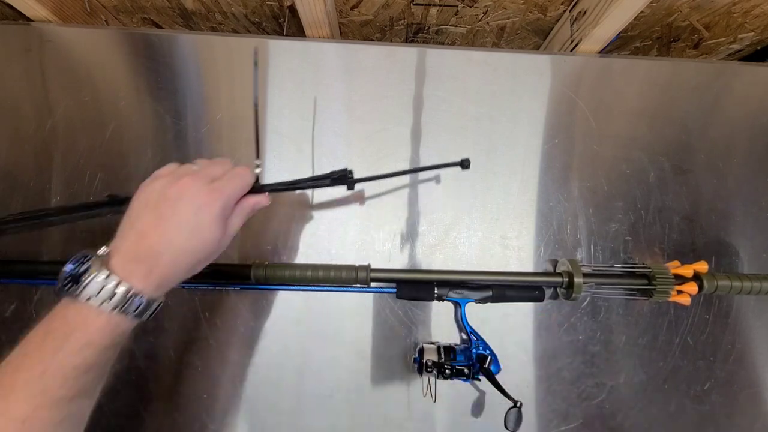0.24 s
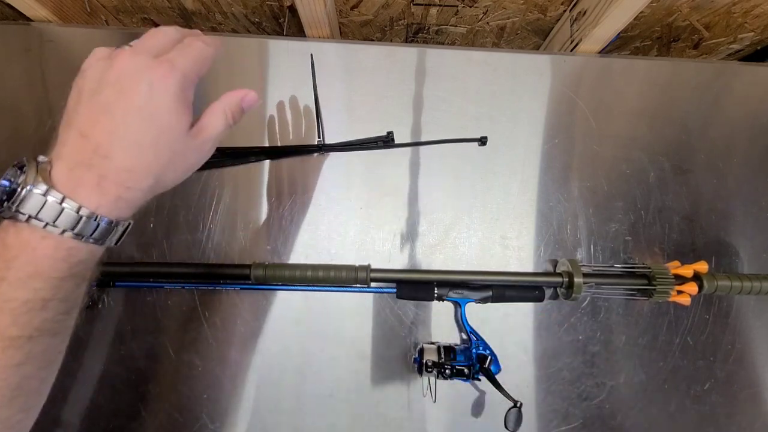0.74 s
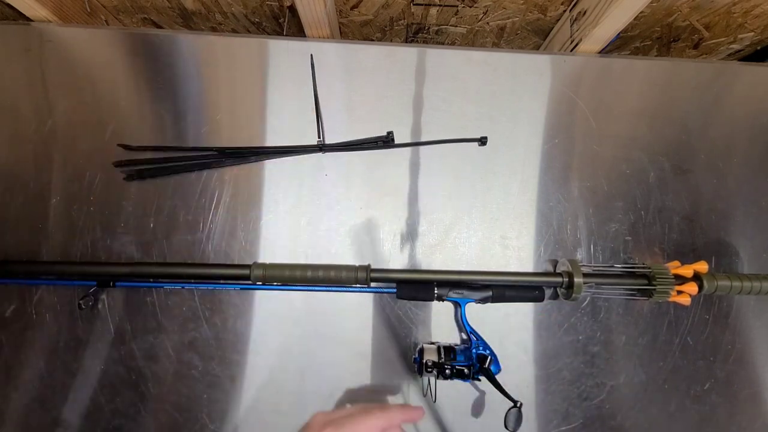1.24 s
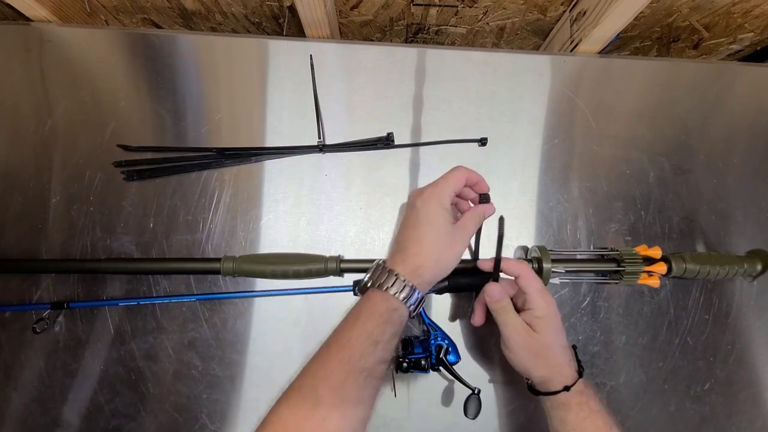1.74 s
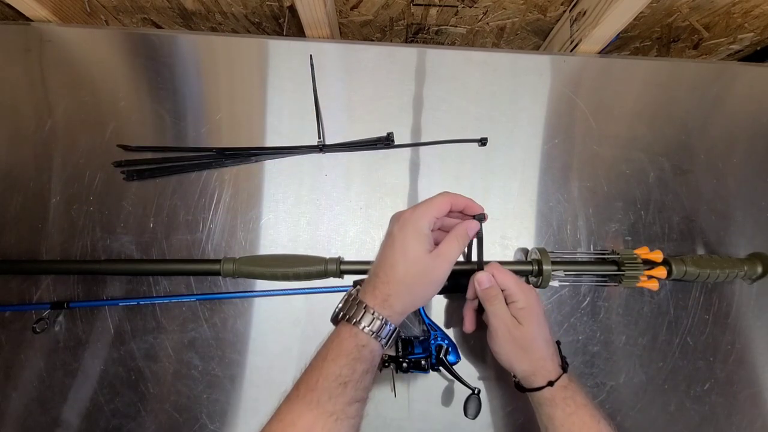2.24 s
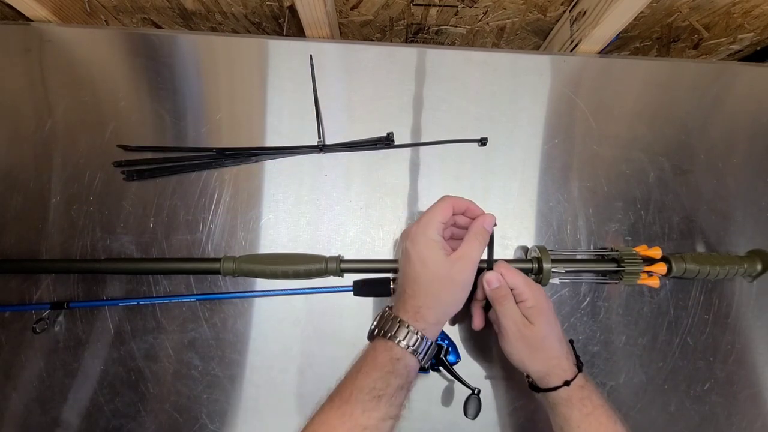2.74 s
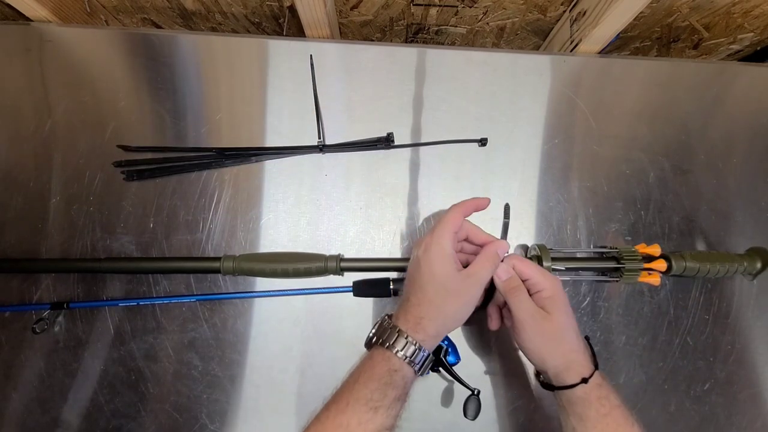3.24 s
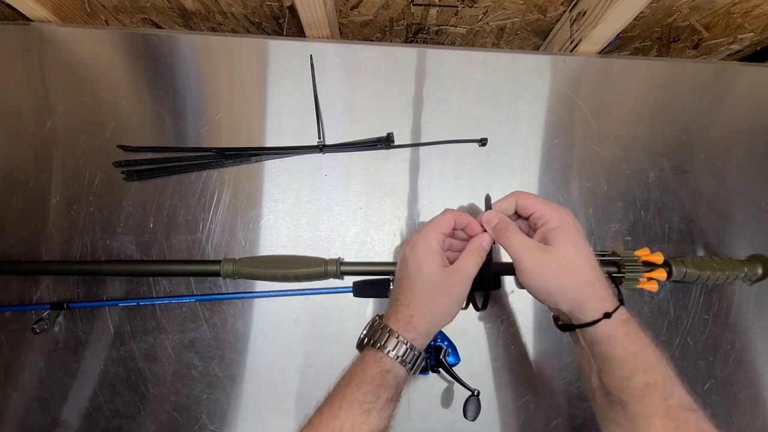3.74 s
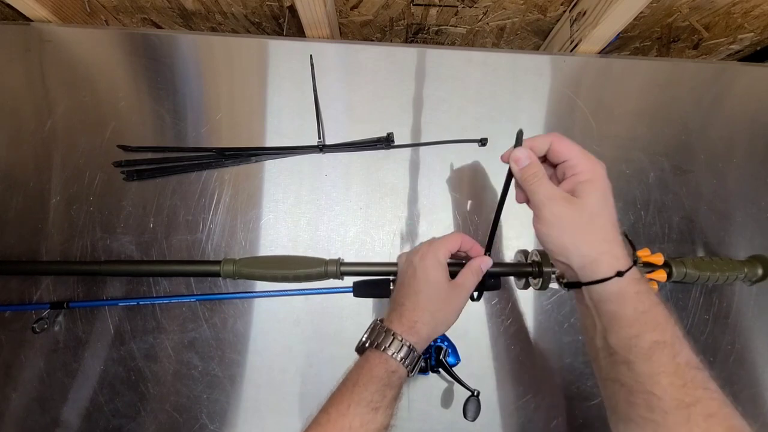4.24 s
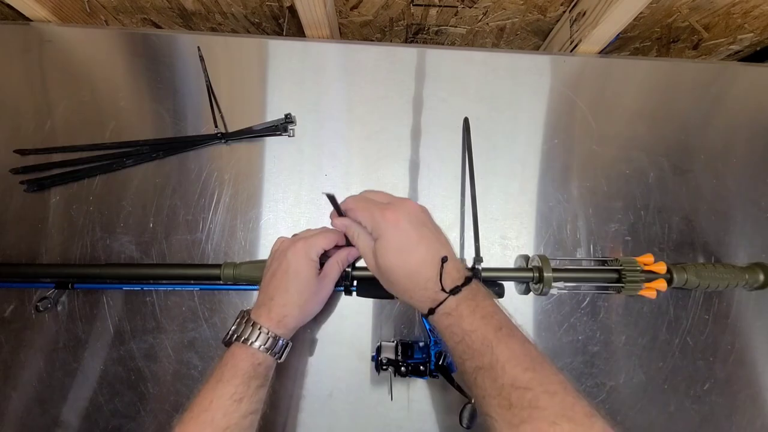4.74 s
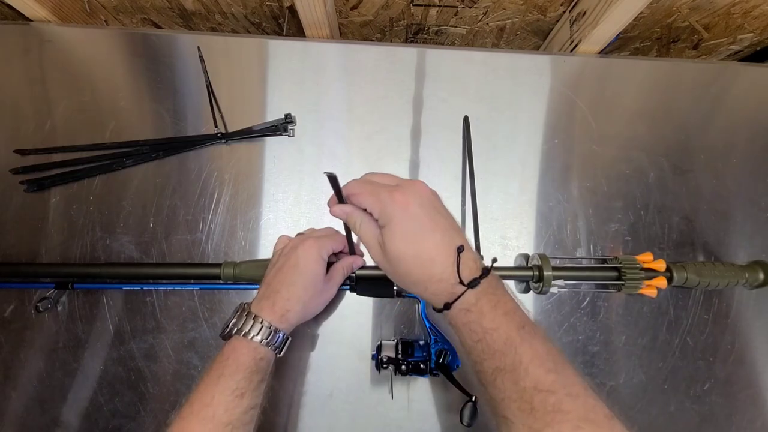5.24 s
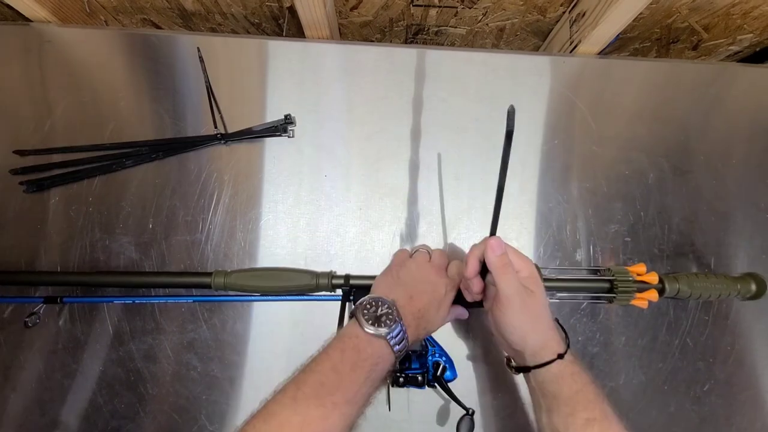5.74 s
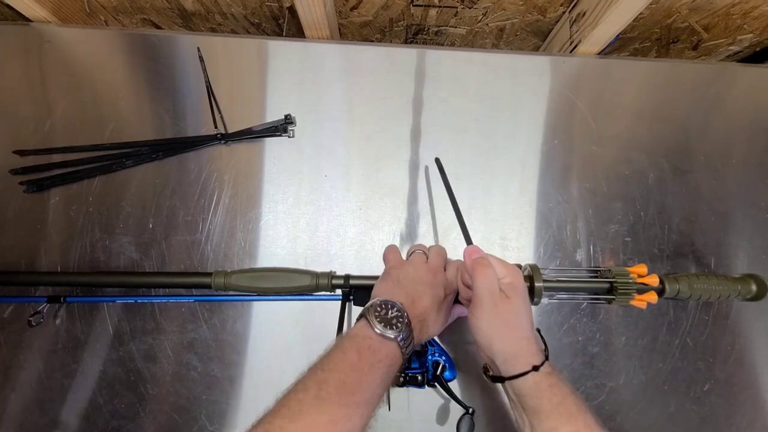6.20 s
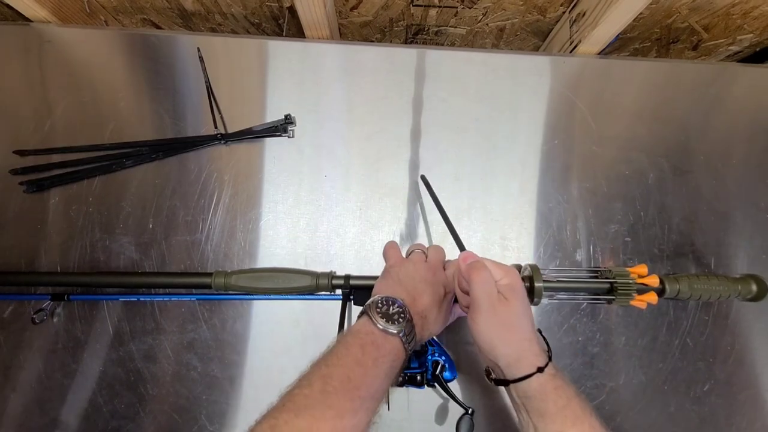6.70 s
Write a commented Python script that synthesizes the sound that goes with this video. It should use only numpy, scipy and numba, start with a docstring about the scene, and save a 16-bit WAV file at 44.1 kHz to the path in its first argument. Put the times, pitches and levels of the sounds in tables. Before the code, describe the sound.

A clatter on sheet metal, a wavering low hum stopping abruptly, then crisp fast zip-tie rasps and scattered clicks with dull bumps of tubes.

```python
"""Cable ties on a workbench

Hands thread plastic cable ties round a bundle of tubes on a sheet-metal bench in a small shed.
The pawl clicks over the strap's teeth, singly or in a fast rasp: impulses ring band-pass resonances.
Knocks and rubs of tubes and ties are rough grains that ring the modes of the bench and bands of noise.
Behind them lie a low wavering hum that stops short, then a rumble; a faint whine and an insect's trill,
both modulated carriers; and the hiss of the shed, shaped noise."""
import sys
import numpy as np
from scipy import signal
from scipy.fft import rfft, irfft, next_fast_len
from scipy.io import wavfile
from scipy.ndimage import uniform_filter1d
from numba import njit

SR = 44100
rng = np.random.default_rng(int(sys.argv[2]) if len(sys.argv) > 2 else 0)


def digitize_waveform(pressure):
    """Quantize a signal to 16-bit integers and store it at the path in sys.argv[1].

    Rows of a 2-D input are taken as channels; values are limited to [-1, 1].
    """
    field = np.atleast_2d(pressure).T
    bounded = np.clip(field, -1, 1)
    quanta = np.round(bounded * 32767).astype(np.int16)
    wavfile.write(sys.argv[1], SR, quanta)


N = 307170
T = np.arange(N) / SR  # time in seconds


def undb(db):
    """Decibels to amplitude ratio."""
    return 10 ** (np.asarray(db) / 20)


def unit(x):
    """Normalisation to unit root-mean-square level."""
    return x / np.sqrt(np.mean(x ** 2))


def noise(alike):
    """Stereo white noise whose interchannel correlation is set by mixing mid and side."""
    mid, side = rng.standard_normal((2, N))
    alike = np.clip(alike, 0, 1)
    return np.sqrt((1 + alike) / 2) * mid + np.sqrt((1 - alike) / 2) * side * np.array([[1], [-1]])


def sides(pan_db):
    """Level panning: left and right gains that differ by pan_db."""
    return undb(np.array([pan_db, -pan_db]) / 2)


def fade(x, t60):
    """Exponential decay: each impulse falls by 60 dB in t60 seconds."""
    pole = np.exp(-np.log(1000) / (max(t60, .001) * SR))
    return signal.lfilter([1], [1, -pole], x)


def walk(rate):
    """Slow random modulation: levels held 1 / rate seconds and smoothed twice, spread near 1."""
    k = int(SR / rate)
    steps = np.repeat(rng.standard_normal(N // k + 1), k)
    return 1.3 * uniform_filter1d(uniform_filter1d(steps, k), k)[:N]


@njit
def svf(x, g, q):
    """State-variable band-pass with a moving centre g = tan(pi f / SR), gain 1 there."""
    y, k = np.empty(x.shape), 1 / q
    for c in range(x.shape[0]):
        b, l = 0., 0.
        for i in range(x.shape[1]):
            v = (b + g[i] * (x[c, i] - l)) / (1 + g[i] * (g[i] + k))
            b, l, y[c, i] = 2 * v - b, l + 2 * g[i] * v, k * v
    return y


def band(x, hz, q):
    """Cascaded resonance: the band-pass applied twice has steeper skirts."""
    g = np.tan(np.pi * np.clip(hz + 0 * T, 20, .45 * SR) / SR)
    return svf(svf(x, g, 1. * q), g, 1. * q)


def colour(x, table):
    """Spectral shaping by (Hz, dB) points joined on a logarithmic frequency axis."""
    hz, db = np.transpose(table)
    size = next_fast_len(N)
    f = np.arange(size // 2 + 1) * SR / size + 1
    gain = undb(np.interp(np.log(f), np.log(hz), db))
    return irfft(rfft(x, size) * gain, size)[..., :N]


def hiss():
    """Broadband air noise: half-octave bands flicker a little, correlated between sides in the bass."""
    # Spectrum of the shed air. Each row: frequency in Hz, relative level in dB per hertz.
    air_spectrum = [(56, -24), (95, -10.5), (137, -20), (159, -32), (463, -33.5), (666, -32.5),
                    (842, -32.5), (1090, -34), (1270, -27.5), (1900, -41), (2070, -38.5), (6160, -40.5),
                    (7400, -46), (8300, -60), (9300, -62), (10000, -43.5), (11300, -40.5), (12000, -48),
                    (15800, -42)]
    out, swell = undb(-11.0) * noise(0), walk(3.055)
    for centre in 70 * 2 ** np.arange(0, 8.1, .5):
        flicker = undb(.9 * swell + 1.5 * walk(14))
        out = out + flicker * band(noise(300 / centre), centre, 2.46)
    level_db = -53.5
    return undb(level_db) * unit(colour(out, air_spectrum))


def shed():
    """Reverberation: convolution with noise whose decay is faster in the treble."""
    # Decay of the small shed. Each row: frequency in Hz, reverberation time t60 in seconds.
    decay_times = [(100, 0.37), (500, 0.55), (1500, 0.39), (4000, 0.21), (10000, 0.17), (16000, 0.093)]
    hz, t60 = np.transpose(decay_times)
    t, tail = T[:SR // 2], 0
    for centre in 90 * 2 ** np.arange(0, 7.6, .5):
        fall = np.exp(-np.log(1000) * t / np.interp(np.log(centre), np.log(hz), t60))
        grain = unit(band(noise(350 / centre), centre, 1.64))[:, :len(t)]
        tail = tail + grain * np.sqrt(centre) * fall
    tail = tail * np.clip(t / 0.0025, 0, 1)
    tail = tail / np.sqrt(np.sum(tail ** 2) / 2)
    return lambda x: signal.fftconvolve(x, tail, axes=1)[:, :N]


def hum():
    """Frequency modulation: a low tone wavers, then stops; narrow and half-pitch rumbles are filtered noise."""
    # The narrow rumble after the hum. Each row: time in seconds, level in dB.
    rumble_levels = [(1.6, -48.5), (3.3, -51), (3.7, -52.5), (4.5, -64.5), (4.65, -45.5), (5.4, -49.5),
                     (7, -45.5)]
    hum_hz, hum_db, stops_s = 75.6, -36, 1.596
    phase = 2 * np.pi * np.cumsum(hum_hz * (1 + 0.0365 * walk(16.9))) / SR
    tone = np.sqrt(2) * np.sin(phase) * undb(.8 * walk(12))
    on = np.clip((stops_s - T) / 0.005, 0, 1)
    rumble_db = np.interp(T, *np.transpose(rumble_levels)) + 1.05 * walk(5.0)
    rumble = undb(rumble_db) * unit(band(noise(1.0), hum_hz * 0.817, 4.3))
    # the wider rumble at half the pitch is stronger while the hum runs
    half = undb(-52.5 + 8.1 * on) * unit(band(noise(0.91), hum_hz / 2, 1.2))
    return on * undb(hum_db) * tone + (1 - on) * rumble + half


def whine():
    """Amplitude envelopes on a sine: a faint thin tone swells and dies away now and then."""
    # Each row: loudest moment in seconds, swell length in seconds, decay t60 in seconds, level in dB.
    swells = [(0.0, 0.06, 0.33, -49.5), (.235, 0.13, 0.35, -48), (.52, 0.11, 0.66, -40),
              (.9, 0.1, 0.97, -56), (1.02, 0.11, 0.71, -61.5), (1.27, .06, 0.13, -62),
              (1.56, 0.048, 0.22, -72), (2.865, 0.12, 0.65, -52)]
    whine_hz = 1200
    level = 0
    for s, rise, t60, db in swells:
        fall = undb(db - 60 * np.clip(T - s, 0, 9) / t60)
        level = level + fall * np.clip(1 + (T - s) / rise, 0, 1) ** 2
    side_phase = np.array([[0], [1.2]])  # left, right in radians
    return np.sqrt(2) * level * np.sin(2 * np.pi * whine_hz * T + .7 * walk(23) + side_phase)


def trill():
    """Amplitude modulation: an insect outside pulses a narrow high noise band, swelling and fading."""
    carrier_hz, pulses_hz, level_db = 10860, 69, -82
    pulses = np.clip(np.sin(2 * np.pi * pulses_hz * T + .5 * walk(1.8)), 0, 1) ** 2
    return undb(level_db + 4.7 * walk(1.6)) * unit(band(pulses * noise(.3), carrier_hz, 13.0))


def squeak():
    """Friction noise: the strap sliding on a tube is heard as faint narrow resonances."""
    # Each row: loudest moment in seconds, length in seconds, frequency in Hz, level in dB.
    slides = [(3.503, 0.27, 3410, -64), (4.405, 0.24, 3400, -57), (2.708, 0.048, 1110, -61),
              (5.135, 0.11, 1080, -44.5), (5.323, 0.098, 851, -57.5), (5.9, 0.57, 3350, -65.5),
              (5.92, 0.34, 1590, -60)]
    air = noise(0.54) * undb(3.1 * walk(60))
    out = 0
    for s, length, hz, db in slides:
        swell = np.cos(np.pi * np.clip((T - s) / length, -.5, .5))
        out = out + undb(db) * swell * unit(band(air, hz, hz / 200))
    return out


def bench(force, shorter=0.63):
    """Modal synthesis: damped modes of bench and tubes, the upper ones less in phase between the sides."""
    # Each row: frequency in Hz, relative level in dB, decay t60 in seconds before it is shortened.
    modes = [(177, -9, .4), (241, -5, .42), (300, -13, .5), (356, -8, .55), (409, 0, .4), (575, -9, .25),
             (689, -7, .55), (750, -7, .42), (847, -8, .3), (995, -8, .45), (1104, -9, .35),
             (1334, -16, .35), (1760, -18, .25), (1932, -15, .33), (2160, -15, .25)]
    out = 0
    for hz, db, t60 in modes:
        pole = np.exp(2j * np.pi * hz / SR - np.log(1000) / (t60 * min(shorter, 1) * SR))
        turn = np.exp(1j * min(hz / 1200, 1) * rng.uniform(-np.pi, np.pi) * np.array([[0], [1]]))
        out = out + undb(db) * (turn * signal.lfilter([1], [1, -pole], force)).imag
    return out


def impact_grains(grains_hz, spread_db):
    """Poisson-like impulse train: sparse impacts of random sign and exponentially spread level."""
    hits = rng.random(N) < grains_hz / SR
    return hits * undb(spread_db * rng.exponential(size=N)) * rng.choice([-1, 1], N)


def shuffle():
    """Stick-slip friction: slip grains of shifting tubes ring the bench and a tube, under a brighter scrape."""
    # Each row: loudest moment in seconds, level in dB, decay t60 in seconds, scrape relative level in dB,
    # tube ring in Hz, tube ring relative level in dB.
    rub_rows = [(0.56, -39, 0.6, -20, 720, -3), (1.722, -32, 0.47, -14.5, 740, -15.5),
                (2.487, -42, 0.27, -9.5, 760, -0.5), (2.7, -49, 1.8, -14, 766, -10),
                (3.112, -38, 1.04, -5.5, 816, -5), (3.225, -32, 0.37, -22, 634, -5),
                (3.4, -52.5, 1.65, -6.5, 880, -27), (3.97, -57.5, 1.5, 1.5, 500, -1),
                (4.044, -49, 0.72, 5, 667, 4.5), (4.148, -47, 1.07, -17, 1080, -23),
                (4.288, -50, 0.5, 2.5, 703, 0), (4.715, -44, 1.06, 5, 630, -5.5),
                (4.891, -53, 0.86, 6, 560, -1.5), (5.102, -48.5, 0.43, -38, 1020, -4),
                (5.162, -37.5, 0.19, -44, 860, -6.5), (5.303, -55, 0.34, -28, 906.7, -5),
                (5.715, -50.5, 0.39, 6.5, 1290, 7), (5.961, -50.5, 1.05, -2, 572, -3),
                (6.427, -39, 0.6, -10, 722, -1), (6.809, -57.5, 0.89, -10.5, 704, -7)]
    rise_s, scrape_hz = 0.11, 2250  # a rub swells by 60 dB in rise_s
    s, db, t60, scrape_db, tube_hz, tube_db = np.transpose(rub_rows)[:, :, None]
    rubs = undb(db - 60 * np.maximum((s - T) / rise_s, (T - s) / t60))
    slips = impact_grains(grains_hz=900, spread_db=1.0)
    rough = fade(np.abs(slips), 0.12)
    # the loudest rub of the moment sets the pitch of the tube
    pitch_hz = uniform_filter1d(tube_hz[rubs.argmax(axis=0), 0], SR // 20)
    tube = unit(band(rough * noise(0.64), pitch_hz, 2.02))
    scrape = unit(band(rough * noise(0.026), scrape_hz, 0.66))
    return (rubs.sum(axis=0) * unit(bench(slips, shorter=0.34))
            + (undb(tube_db) * rubs).sum(axis=0) * tube
            + (undb(scrape_db) * rubs).sum(axis=0) * scrape)


def knocks(rise_s=0.0033):
    """Impact excitation: a dying rattle of grains drives thud, ringing bench, dull body, crack and tick."""
    # Each row: start in seconds, drive level in dB, then thud, crack and tick relative to it in dB,
    # rattle decay t60 in seconds, left minus right in dB.
    blows = [(0.4614, -13, -20, 1, -1.5, 0.26, 2), (0.47, -19.5, -41, 10, 9, 0.055, -5.5),
             (0.496, -20.5, -10.5, -1, -37.5, 0.13, -7), (0.554, -32, -12, 2.5, -17, 0.23, -7),
             (1.545, -54.5, -8.5, 11, 7, 0.037, -4), (1.594, -45, 1, -21, -20.5, 0.058, -1),
             (1.693, -26, 0, -5.5, -17, 0.16, 0), (1.705, -28.5, -10, -1, -24, 0.15, -6),
             (1.743, -24, -6.5, -38, -46, 0.1, -2), (2.444, -48.5, 13.5, 3, -34, 0.084, -2),
             (2.453, -29.5, -7.5, -2, -28, 0.075, -1), (2.669, -36, -6, -8, -36, 0.19, -1),
             (3.1669, -20.5, 0.5, -1, -22, 0.092, 3), (3.178, -22, -7.5, -4, -19, 0.3, -3.5),
             (4.635, -60, 22, 8.5, 12, 0.12, -1), (4.702, -42.5, -10.5, -12.5, 23, 0.85, 5.5),
             (5.09, -45.5, 6.5, 11, 14, 0.22, -3), (5.342, -48, -10.5, 7, -19, 0.033, 0),
             (5.6924, -30.5, -29, -3, -17, 0.02, 4), (5.696, -38, -50.5, -6, -11.5, 0.36, -5.5),
             (5.757, -36, -8, -5.5, -6, 0.087, -1), (6.226, -37, -5.5, -5, -10, 0.25, 0),
             (6.395, -31, -9, -2.5, -19, 0.43, -1.5), (6.757, -54.5, -10, 10, -9.5, .04, -1.5),
             (6.766, -46.5, 5.5, -0.5, -31, 0.13, -1.5)]
    kick_db, kick_hz, kick_late_s = 33.5, 200, .001
    grains = impact_grains(grains_hz=1300, spread_db=3.0)
    layers, kicks = np.zeros((4, 2, N)), np.zeros((2, N))
    for s, db, thud_db, crack_db, tick_db, t60, pan_db in blows:
        at = int(s * SR)
        t = T[:min(SR, N - at)]
        fall = np.exp(-np.log(1000) * t / max(t60, .005)) * np.clip(t / rise_s, 0, 1)
        gains = undb(db + np.array([thud_db, 0, crack_db, tick_db]))
        layers[:, :, at:at + SR] += gains[:, None, None] * sides(pan_db)[:, None] * fall
        kicks[:, at + int(kick_late_s * SR)] += gains[0]
    thud, body, crack, tick = layers
    rough = unit(fade(np.abs(grains), 0.067))
    # each blow pushes the sheet once, then it booms near 100 Hz over a wider thump
    push = undb(kick_db) * band(kicks, kick_hz, 1.0)
    boom = band(thud * noise(1), 103, 7.2) + undb(-3.5) * band(thud * noise(1.0), 116.0, 0.46)
    ringing = undb(-30.0) * bench(body.mean(axis=0) * grains)
    dull_body = undb(4.5) * band(body * rough * noise(0.81), 590, 0.43)
    bright_crack = undb(2.0) * band(crack * rough * noise(0.018), 3780, 0.65)
    sharp_tick = undb(5.0) * band(tick * rough * noise(.1), 13500, .9)
    return push + undb(24.0) * boom + ringing + dull_body + bright_crack + sharp_tick


def pulled_teeth(uneven=.05, scatter_db=1.5):
    """Phase accumulation: a click each time a tooth passes in a fast pull, a little early or late."""
    # Pulls of the strap through the head, one list each.
    # Each row: time in seconds, tooth rate in Hz, level in dB at 450 teeth per second.
    strap_pulls = [
        [(3.0775, 602, -11), (3.11, 602, -10.5), (3.132, 303, -15)],
        [(4.023, 298.4, -13), (4.06, 441.6, -9.5), (4.076, 441, -10.5), (4.09, 333, -11.5), (4.13, 392, -13),
         (4.19, 349.4, -13), (4.24, 382, -14), (4.252, 272, -20), (4.285, 297.8, -14.5), (4.33, 254.6, -19.5),
         (4.357, 194.1, -10)],
        [(4.699, 722, -4.5), (4.75, 408, -9.5), (4.78, 178, -9.5)],
    ]
    rows = []
    for pull in strap_pulls:
        when, teeth_hz, db = np.transpose(pull)
        hz = np.interp(T, when, teeth_hz, left=0, right=0)
        passes = np.flatnonzero(np.diff(np.floor(np.cumsum(hz) / SR)))
        at = np.append(int(when[0] * SR) + 1, passes)
        chance = rng.standard_normal((N // 200, 2))[:len(at)].T
        s = at / SR + uneven * chance[0] / hz[at]
        # denser teeth share the same level, so each is weaker
        tooth_db = np.interp(s, when, db) + scatter_db * chance[1] - 10 * np.log10(hz[at] / 450)
        rows += zip(s, tooth_db)
    return rows


def ratchet(pawl_hz=15200, tube_hz=3450, buzz_t60=0.04, buzz_db=-35.0):
    """Impulse-excited resonance: the pawl snaps off each tooth; loop, tube, strap, head and pawl ring."""
    # Teeth placed one by one, from lone clicks to short quick runs.
    # Each row: start in seconds, relative level in dB.
    placed_teeth = [(2.7736, -31.5), (2.7893, -30), (2.829, -12.5), (3.0742, -8), (3.1382, -15),
                    (3.1418, -12.5), (3.1497, -14.5), (3.157, -14), (3.17, -16.5), (3.7929, -7),
                    (3.8208, -7), (3.8423, -8), (3.859, -6.5), (3.8786, -8), (3.8952, -8), (3.911, -10),
                    (3.932, -9), (3.9468, -11), (3.9582, -9), (3.97, -10), (3.98, -8.5), (3.99, -8),
                    (3.998, -13.5), (4.003, -10.5), (4.0121, -11), (4.019, -9), (4.365, -10), (4.3715, -12),
                    (4.3773, -11.5), (4.383, -10.5), (4.3903, -11.5), (4.4, -12.5), (4.408, -11),
                    (4.4197, -13.5), (4.4368, -13), (4.45, -14), (4.4616, -9.5), (4.4737, -12.5),
                    (4.4859, -12), (4.5043, -12), (4.6583, -8.5), (4.6936, -13), (4.781, -10),
                    (4.7914, -9.5), (4.8, -10.5), (4.8148, -7.5), (4.828, -11), (4.8389, -11),
                    (4.8524, -9.5), (4.864, -5.5), (4.8725, -7), (4.878, -8.5), (4.8857, -9.5),
                    (4.8925, -7.5), (4.899, -8), (4.907, -9), (4.914, -10), (4.9212, -11.5), (4.93, -10),
                    (4.9374, -7), (4.9415, -7.5), (4.949, -9), (4.957, -8), (4.9634, -9.5), (4.9722, -12.5),
                    (4.9909, -11.5), (5.02, -12.5), (5.042, -10), (5.0591, -8), (5.07, -9), (5.08, -9),
                    (5.091, -10), (5.1, -9.5), (5.11, -6.5), (5.1225, -12), (5.1353, -8.5), (6.2345, -15),
                    (6.3614, -11.5), (6.4499, -10), (6.5012, -10.5), (6.565, -10.5), (6.676, -15)]
    # The tie as the loop closes and the hands move. Each row: time in seconds, strap ring in Hz,
    # strap level in dB, head ring in Hz, head level in dB, pawl level in dB, loop ring in Hz,
    # loop level relative to the strap in dB, tube level in dB, longest chatter in milliseconds,
    # left minus right in dB, lag of the left side in samples.
    tie_states = [(2.8, 7140, -4, 11100, -7, -7, 2900, -16.5, -37, 3.7, -6, 2.6),
                  (3.073, 7050, -11.5, 12000, 3, 0, 2900, -12, -23, 0.33, -2, 1.5),
                  (3.11, 6640, 0, 12300, -0.5, -6, 2940, -16, -33, 0.6, -2.5, 3.5),
                  (3.155, 5340, -3.5, 11600, -5, -5, 2900, -34, -42, 4.6, -4.5, 2),
                  (3.17, 6540, -5, 11000, -20, -22, 2900, -11, -40, 3.1, -11, 4),
                  (3.8, 7270, -12, 9000, -14.5, -1, 3300, -20.5, -34.5, 4.3, -1, 1.3),
                  (4.0, 6800, -10.5, 10500, -5.5, 1, 3300, -14, -36, 3.3, 1.5, 2.5),
                  (4.15, 5860, -16, 10840, -5.5, -2.5, 1500, -18, -47, 2.6, -3.5, 1.5),
                  (4.26, 6950, -8.5, 12500, -3.5, -4.5, 1300, -14.5, -31, 1.1, -5.5, 3.5),
                  (4.329, 7510, -8.5, 13000, -10.5, -9, 1600, -21.5, -25, 1.15, -3.5, 3),
                  (4.399, 7800, -13.5, 12900, -7, -5, 4400, -8.5, -31, 0.88, -6, 3.5),
                  (4.5, 7384, -12.5, 13700, -1.5, -1, 4400, -2, -24, 1.26, -4.5, -5.5),
                  (4.66, 7895, -6.5, 11000, -1, -12, 2900, -20.5, -41, 3.85, -5.5, -2.5),
                  (4.71, 6600, -14, 11330, -1, -6.5, 2700, -7.5, -45.5, 3.2, -3, -1.5),
                  (4.8, 9000, -18.5, 11090, -1, -14, 2900, -1.5, -43.5, 3.4, -7, -1),
                  (4.93, 8800, -6.5, 10700, -3.5, -11, 3050, -20.5, -46, 2.8, -3, -3),
                  (5.13, 9200, -13.5, 11060, -3, -5, 3000, -9, -49, 4, -7, -4),
                  (6.23, 5600, -4.5, 11930, 4.5, -7, 2900, -14, -46, 4, -6.5, -2),
                  (6.36, 5003, -8, 11300, -2.5, -7.5, 2900, -16.5, -18, 2.32, -5.5, 2.5),
                  (6.68, 4220, -4.5, 10900, -15.5, -18, 2900, -28, -24, 2.25, -7, 1.5)]
    s, tooth_db = np.transpose(sorted([*map(tuple, placed_teeth), *pulled_teeth()]))
    when, *parts, pan_db, lag = np.transpose(tie_states)
    (strap_hz, strap_db, head_hz, head_db, pawl_db,
     loop_hz, loop_db, tube_db, chatter_ms) = (np.interp(s, when, part) for part in parts)

    # every tooth rings the parts in a slightly different mix, less so when teeth follow fast
    gap_s = np.diff(s, append=10)
    slack = np.clip(gap_s / 0.008, 0, 1)
    vary = rng.standard_normal((N // 200, 4))[:len(s)].T * slack
    strap_db, head_db, pawl_db = strap_db + vary[0], head_db + vary[1], pawl_db + vary[2]
    strap_hz = strap_hz * (1 + .04 * vary[3])

    # a faster pull leaves less time to chatter
    longest_s = np.clip(chatter_ms, .3, 4.5) / 1000
    lasts = np.clip(0.5 * gap_s - .0011, .00005, longest_s)
    chance = rng.random((len(s), 18)).T
    at = ((s + lasts * (np.arange(6)[:, None] + chance[:6]) / 6) * SR).astype(int)
    # six snaps a tooth, the second the hardest; when teeth follow fast the others weaken
    snaps_db = np.array([[-4.0], [2.0], [-4.0], [-3.0], [-8.0], [-11.0]]) - 5 * (chance[6:12] - .4)
    snaps_db[[0, 2, 3, 4, 5]] -= 40 * np.clip(.6 - slack, 0, 1)
    signs = np.sign(chance[12:] - .5)

    # moving resonances follow the latest tooth, 1 ms ahead of it
    last = np.clip(np.searchsorted(s, T + .001) - 1, 0, None)
    resonances = (  # level in dB, centre in Hz, q, gain in dB
        (strap_db + loop_db, loop_hz[last], 2.8, 17.0),
        (tube_db, tube_hz, 11.0, 26.0),
        (strap_db, strap_hz[last], 2.2, 17.5),
        (head_db, head_hz[last], 2.5, 17.5),
        (pawl_db, pawl_hz, 2.4, 23.0))
    out = 0
    for db, hz, q, gain_db in resonances:
        hits = np.zeros(N)
        np.add.at(hits, at, undb(tooth_db + db + gain_db + snaps_db) * signs)
        buzz = undb(buzz_db) * fade(np.abs(hits), buzz_t60) * np.sign(noise(0.39))
        out = out + band(hits + buzz, hz, q)
    late = np.round(np.interp(T, when, lag)).astype(int)
    out[0] = out[0, np.clip(np.arange(N) - late, 0, N - 1)]
    # the left port is shaded from the treble
    out[0] = colour(out[0], [(4000, 1.5), (9000, 2.0), (16000, -8.0)])
    return out, sides(np.interp(T, when, pan_db))


def scene():
    """Superposition of all sources; ties and knocks also excite the reverberation of the shed."""
    tie_wet_db, knock_wet_db = -11.5, -6
    (tie, place), blows = ratchet(), knocks()
    echo = shed()
    tie = place * (tie + undb(tie_wet_db) * echo(tie))
    blows = blows + undb(knock_wet_db) * echo(blows)
    return tie + blows + shuffle() + hum() + whine() + squeak() + trill() + hiss()


def record(dry):
    """Linear filtering and gain: microphone port colour, two brief level dips, a steep top cut."""
    # Colour of the microphone ports. Each row: frequency in Hz, gain in dB.
    port_response = [(24, 4), (34, -1.2), (4000, 0), (5200, -3), (6400, 0.5), (8000, -1.5), (9000, -5.5),
                     (10000, -4), (11000, -5)]
    # The level dips briefly. Each row: start in seconds, end in seconds, gain in dB.
    level_dips = [(1.597, 1.599, -12), (4.627, 4.636, -35)]
    top_hz = 15720
    db = sum(np.interp(T, [a - .004, a, b, b + 0.0013], [0, d, d, 0]) for a, b, d in level_dips)
    top_cut = signal.ellip(12, .2, 90, top_hz, fs=SR, output="sos")
    return signal.sosfilt(top_cut, colour(dry, port_response) * undb(db))


dry = scene()
out = record(dry)
digitize_waveform(out)
```